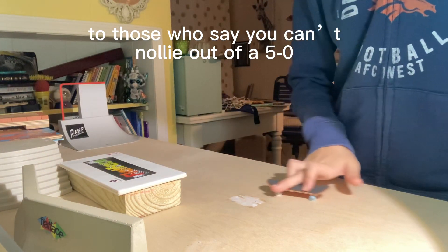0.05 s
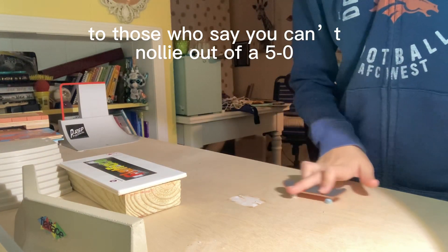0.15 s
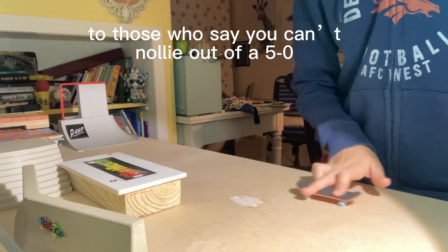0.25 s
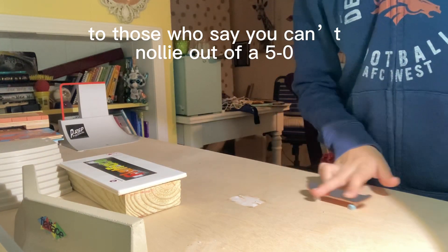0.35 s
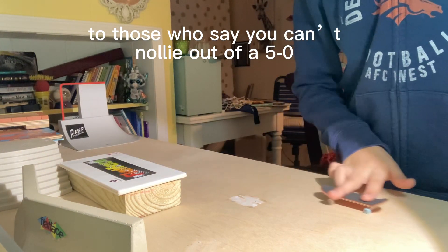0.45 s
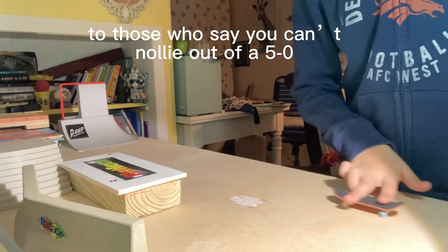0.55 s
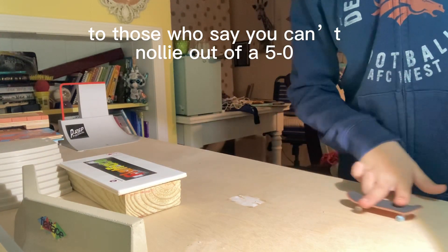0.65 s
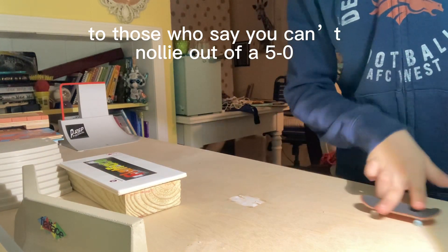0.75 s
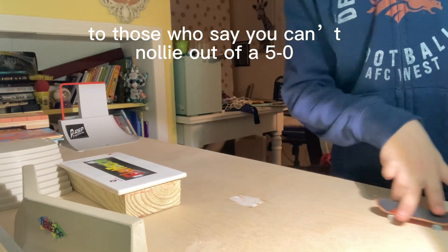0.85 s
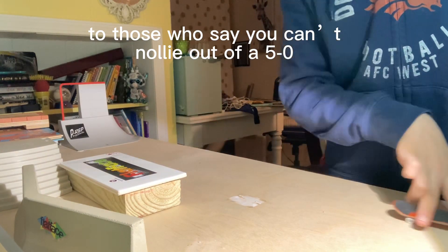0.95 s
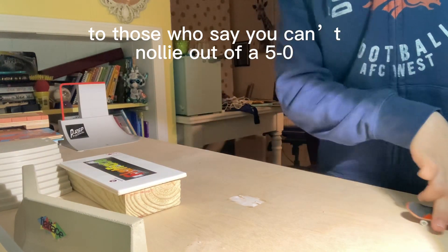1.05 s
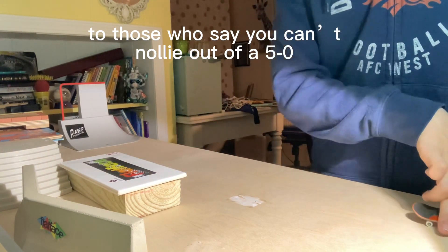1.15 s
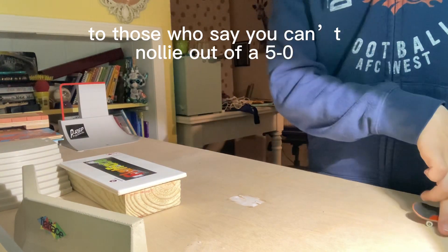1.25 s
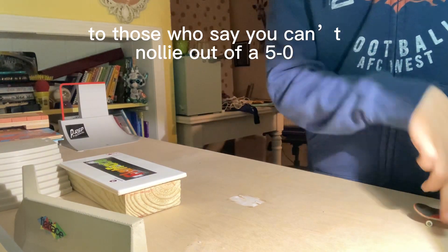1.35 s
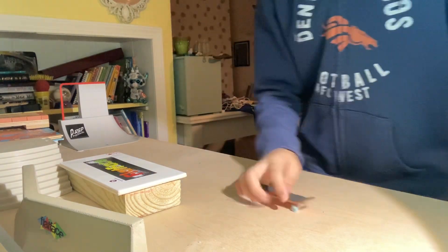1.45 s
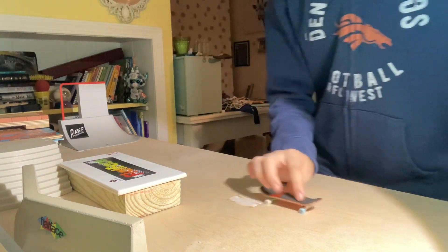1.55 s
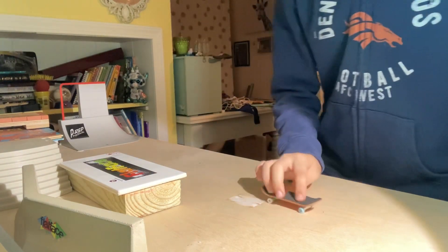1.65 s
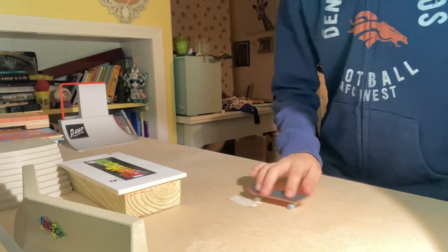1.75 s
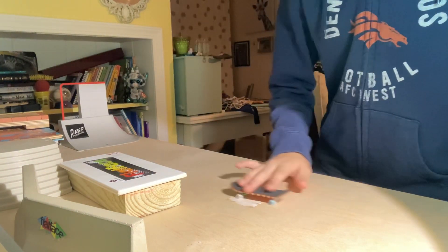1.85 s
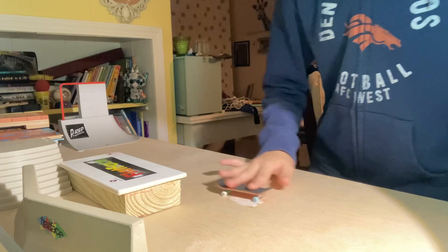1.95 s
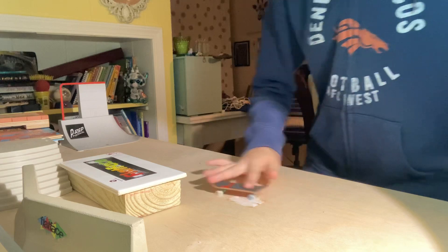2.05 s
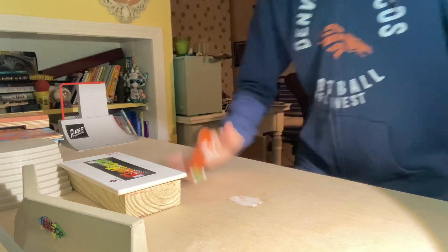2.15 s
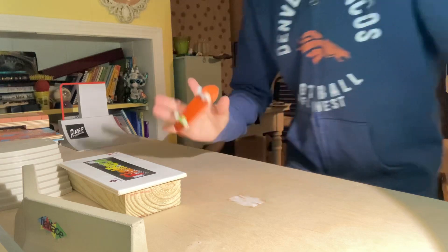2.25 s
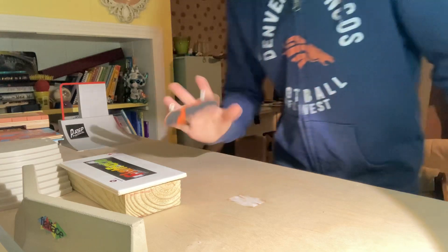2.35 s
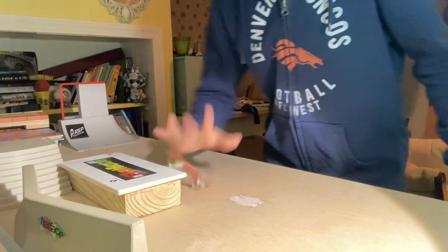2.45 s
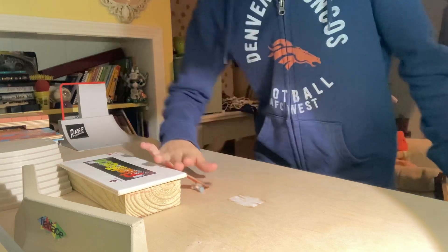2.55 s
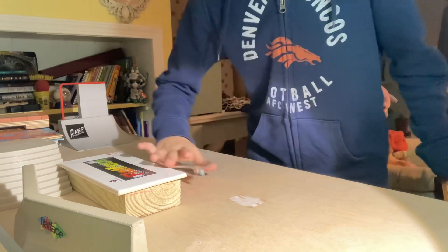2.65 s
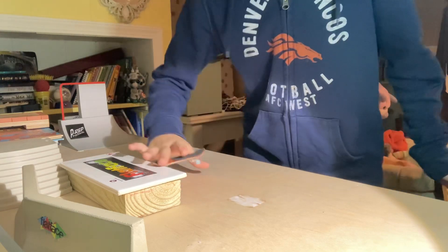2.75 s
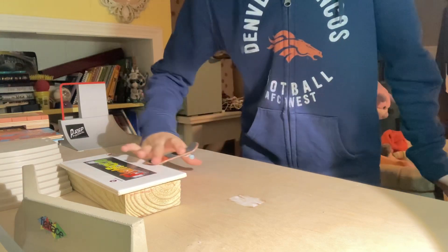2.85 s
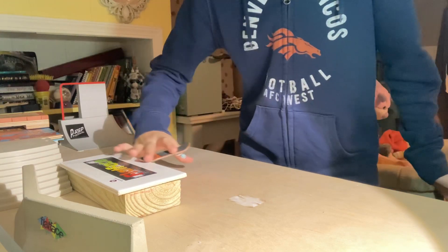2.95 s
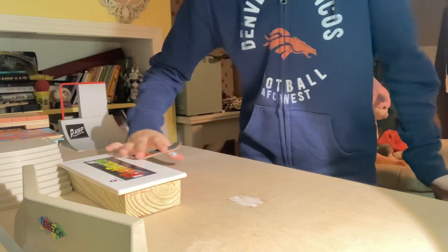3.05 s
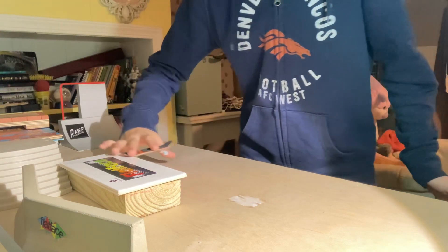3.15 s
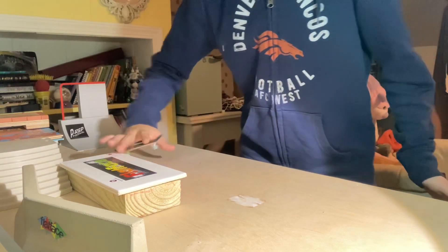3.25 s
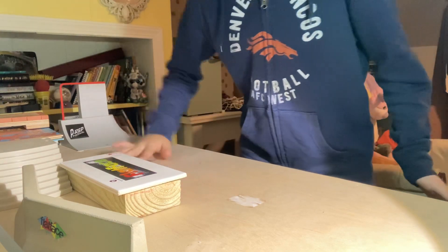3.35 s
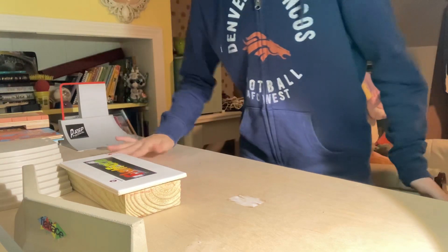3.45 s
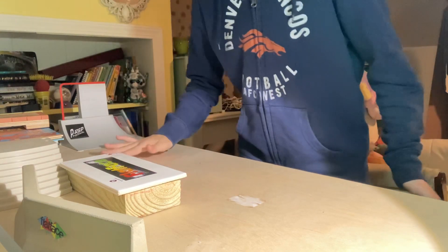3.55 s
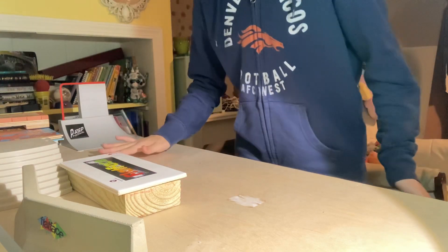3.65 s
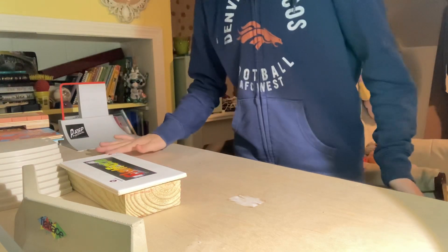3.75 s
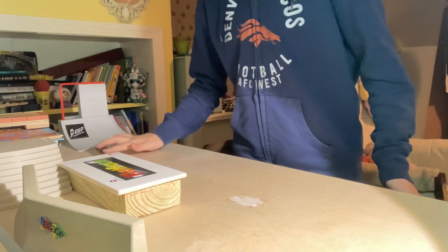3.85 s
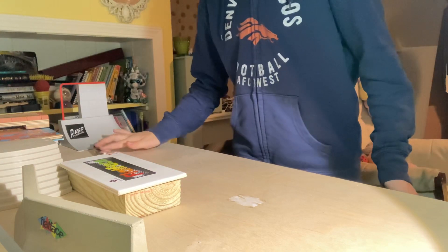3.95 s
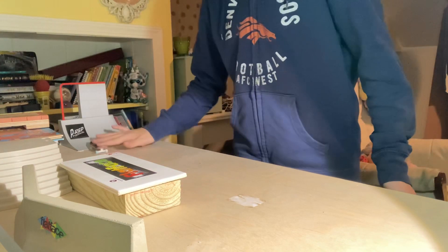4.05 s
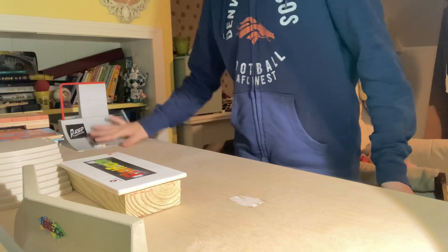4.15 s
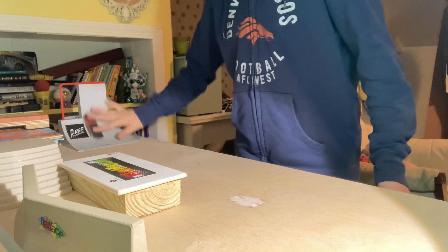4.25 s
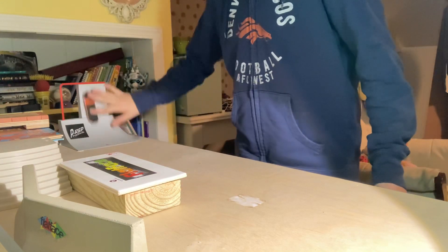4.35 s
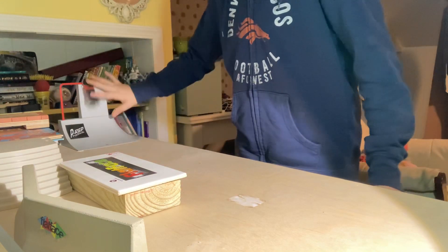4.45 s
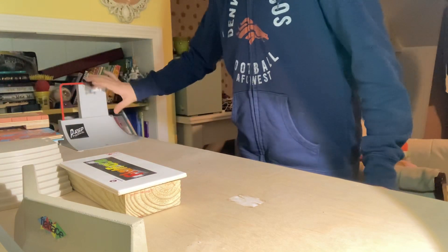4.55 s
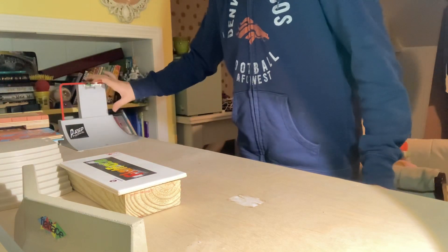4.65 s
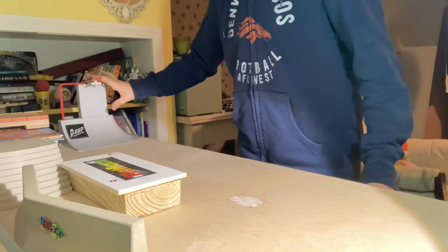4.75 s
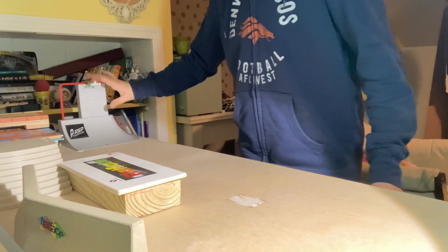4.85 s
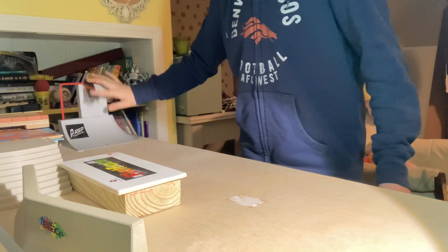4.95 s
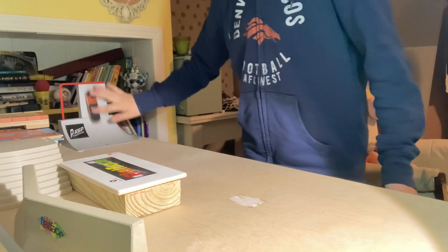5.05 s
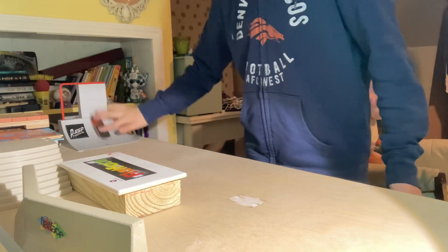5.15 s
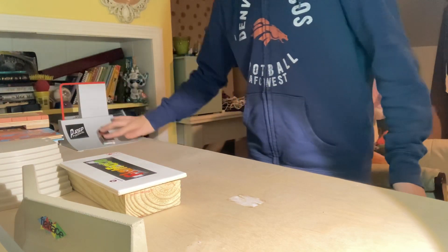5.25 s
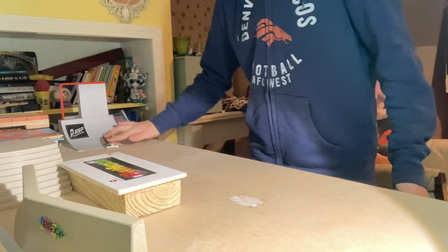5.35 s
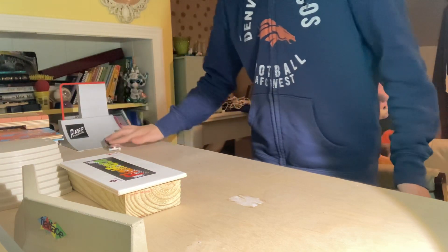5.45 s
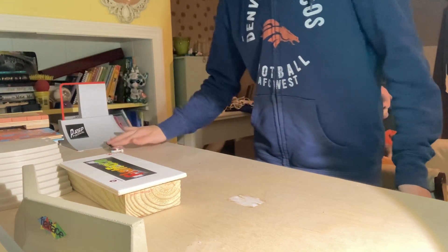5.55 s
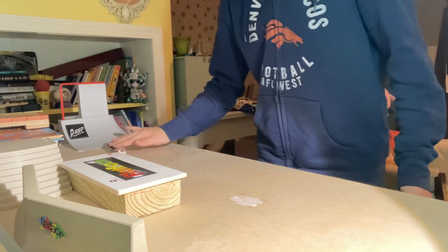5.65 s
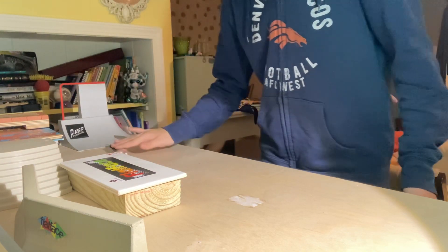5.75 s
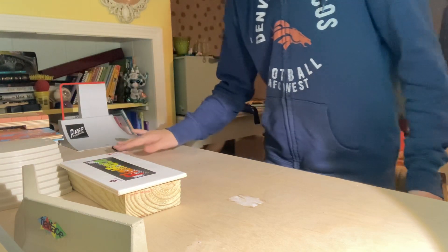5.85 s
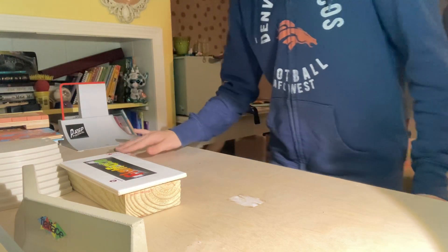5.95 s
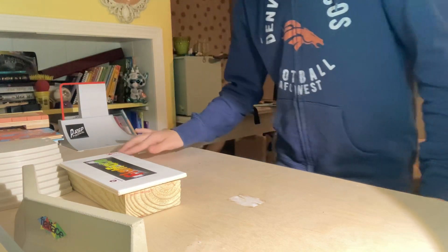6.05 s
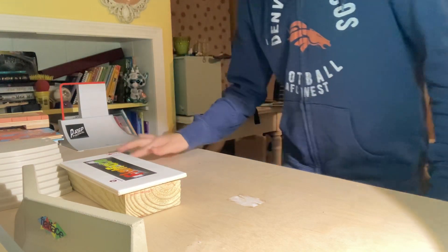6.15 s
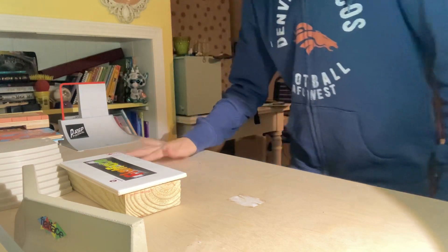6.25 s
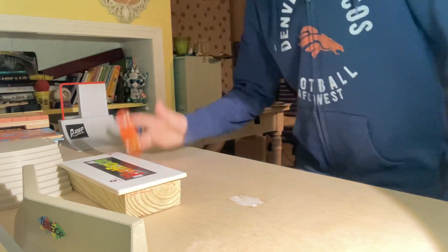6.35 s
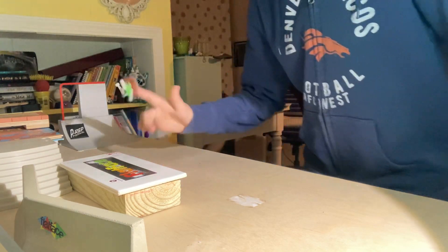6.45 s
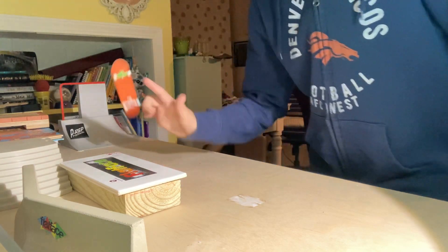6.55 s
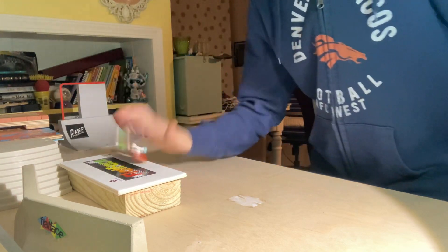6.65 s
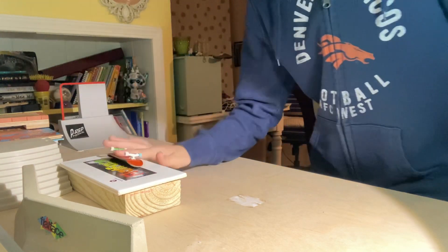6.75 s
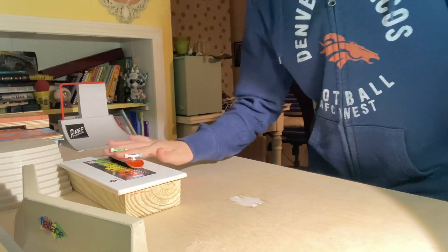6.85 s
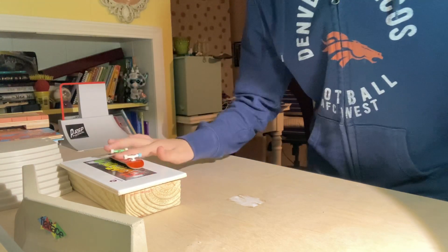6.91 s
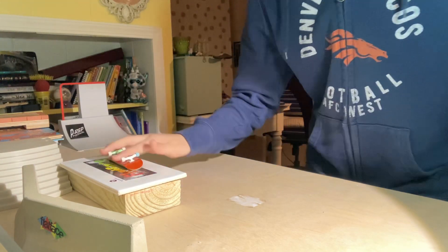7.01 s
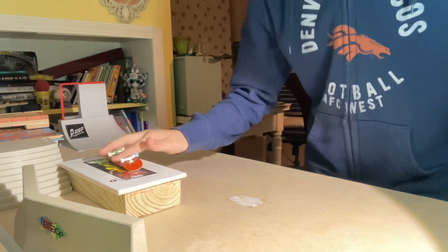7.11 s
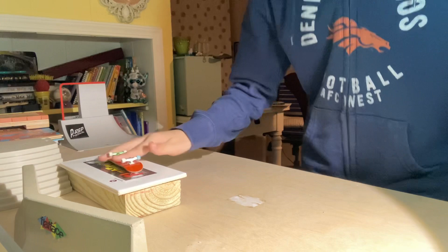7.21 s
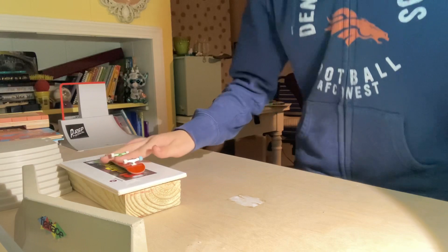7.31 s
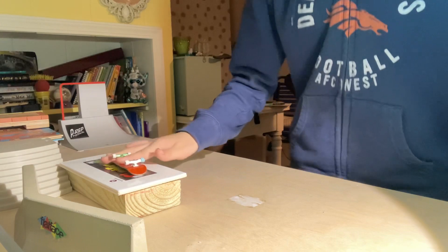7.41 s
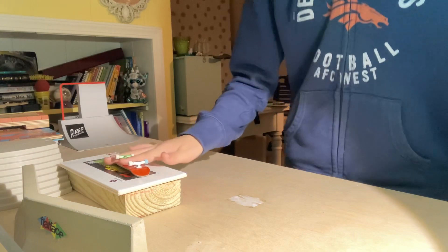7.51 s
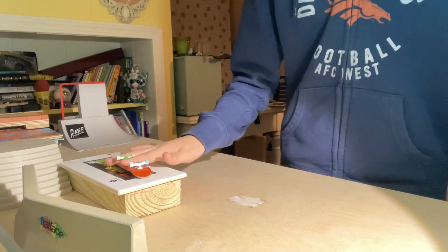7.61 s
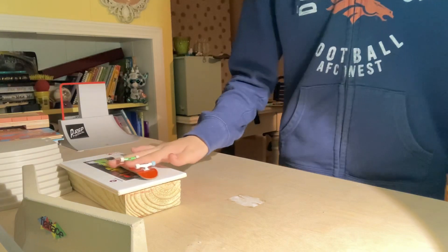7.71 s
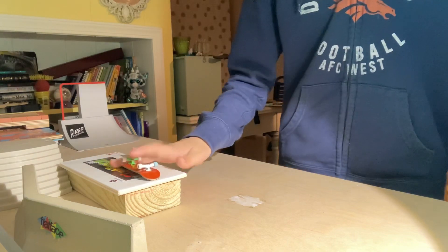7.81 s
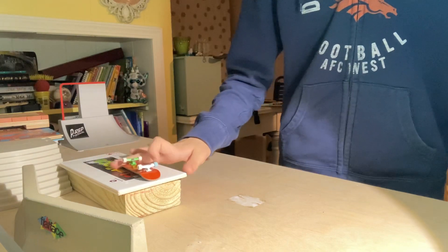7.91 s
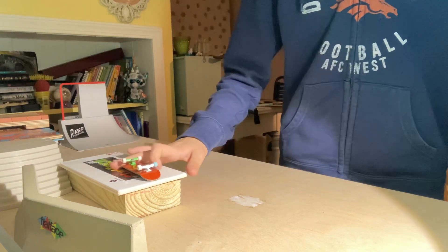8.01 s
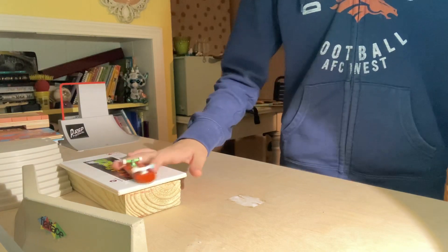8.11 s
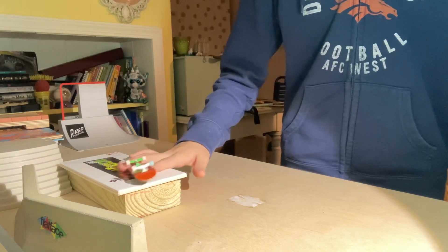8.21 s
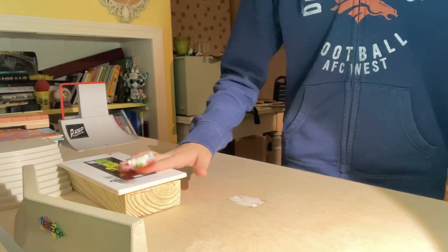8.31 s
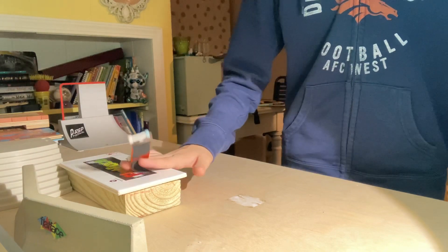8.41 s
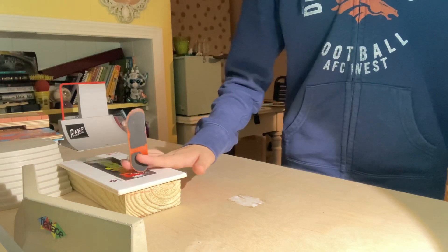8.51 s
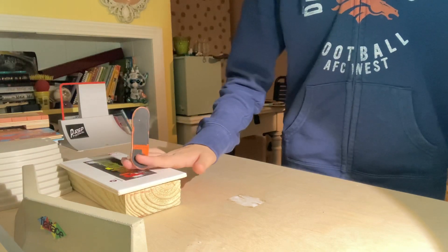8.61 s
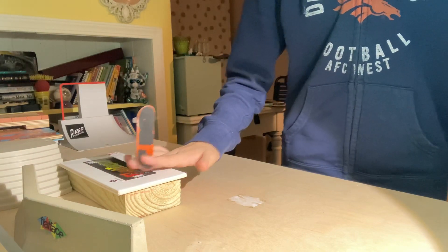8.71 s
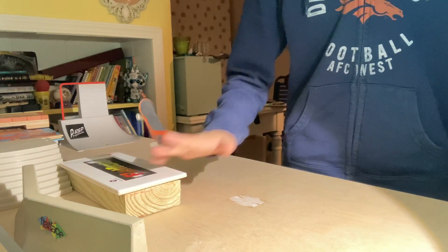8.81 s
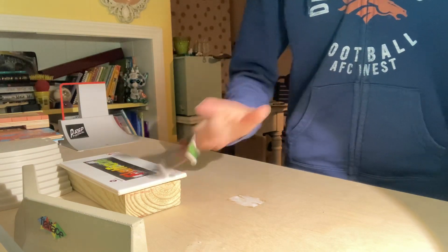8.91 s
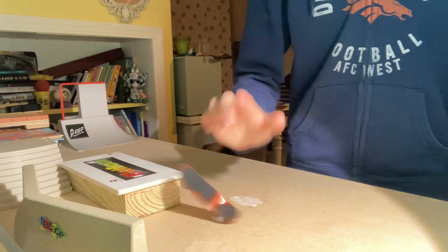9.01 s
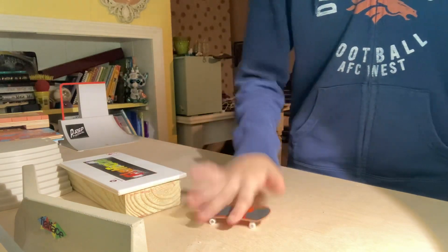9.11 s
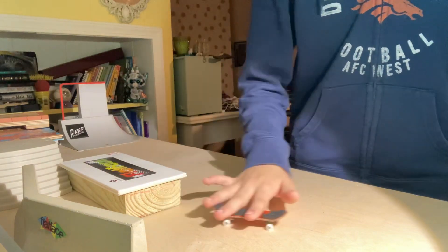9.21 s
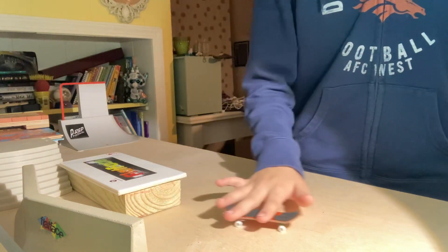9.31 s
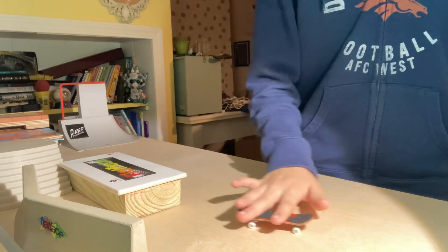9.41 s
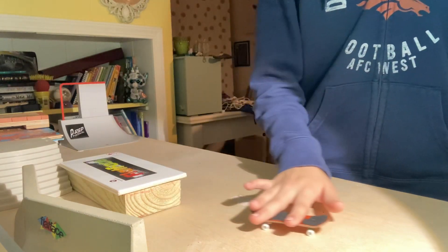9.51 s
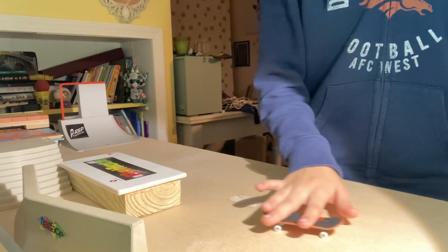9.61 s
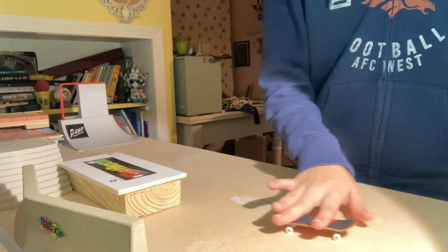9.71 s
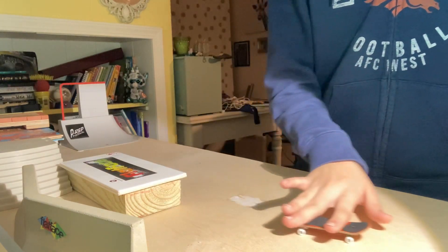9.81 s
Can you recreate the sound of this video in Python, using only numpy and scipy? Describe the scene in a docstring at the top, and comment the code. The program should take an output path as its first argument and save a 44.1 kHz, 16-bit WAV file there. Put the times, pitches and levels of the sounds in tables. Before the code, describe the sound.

Gritty little wheels roll over a desktop with sharp pops and landings, a hollow box knock, a near-silent pause, then a final rattling drop.

```python
"""A wooden desk in a small room: a toy skateboard rolls over it and up a small ramp, is popped,
lands, and grinds along a hollow box, where a hand then rubs and presses it.
Wheels and skin are gritty noise in moving colours; each contact cracks and rings the modes of desk or box.
Two microphone ports hear it with different colour and phase, with the room's answer, over a low house rumble."""
import sys
import numpy as np
from scipy import signal
from scipy.fft import rfft, irfft, next_fast_len
from scipy.io import wavfile
from scipy.ndimage import uniform_filter1d, map_coordinates

SR = 44100
rng = np.random.default_rng(int(sys.argv[2]) if len(sys.argv) > 2 else 0)


def bounce(signal):
    """Save signal as a 16-bit WAV file at the path given by the first command-line argument."""
    frames = np.transpose(np.atleast_2d(signal))
    limited = np.clip(frames, -1, 1)
    pcm = np.round(limited * 32767).astype(np.int16)
    wavfile.write(sys.argv[1], SR, pcm)


N = 435266  # samples

# rolling on desk and ramp, one curve a stroke:
# (time [s], low rumble [dB], roar of fast wheels [dB], loudest desk resonance [Hz])
ROLLING = [
    [(0, -45, -51, 764), (0.2, -38.5, -45.5, 701), (0.45, -46, -51, 780), (0.53, -48, -48, 815),
     (0.7, -42.5, -48, 830), (0.85, -43.5, -48, 840), (1.03, -48.5, -51.5, 835), (1.09, -60.5, -71, 744),
     (1.19, -81.5, -85, 430)  ],
    [(1.44, -66.5, -75, 610), (1.46, -45, -44.5, 430), (1.49, -36, -44.5, 432)],
    [(1.58, -57.5, -53, 600), (1.71, -53, -57, 627), (1.755, -35, -45.5, 606.5), (1.99, -38, -46, 623),
     (2.04, -64.5, -66.5, 590), (2.055, -42.5, -47, 620), (2.1, -55, -46, 820), (2.108, -35, -36.5, 950),
     (2.15, -35, -31, 980), (2.168, -51, -48, 800)],
    [(3.42, -43.5, -47, 470), (3.5, -33, -41, 700), (3.7, -48, -54, 700), (3.85, -43.5, -51.5, 490.7),
     (4.09, -34.5, -42, 480), (4.25, -32, -30.5, 510), (4.33, -35, -31.5, 506), (4.345, -34, -28, 977),
     (4.4, -38.5, -28.5, 975), (4.46, -47, -49, 960), (4.56, -68, -56, 887), (4.66, -48.5, -84, 435)],
    [(4.9, -75.5, -58, 542), (4.96, -47.5, -69, 500), (5.02, -76, -65, 880), (5.09, -41, -37.5, 880),
     (5.14, -42.5, -32.5, 467), (5.195, -35, -29.5, 477), (5.4, -35.5, -42.5, 469), (5.75, -45, -55, 450),
     (5.88, -44, -53, 504), (5.93, -42, -50, 743), (6.12, -39.5, -49, 644), (6.21, -32, -35.5, 658),
     (6.285, -36.5, -36, 837), (6.315, -53.5, -56, 600), (6.34, -45, -53, 640)],
    [(9.21, -55, -57.5, 719), (9.3, -53.5, -57, 850), (9.52, -48, -53, 594), (9.68, -56, -56.5, 609),
     (9.87, -49, -55.5, 604)],
]
# resonances of the desk top: (frequency [Hz], level before each contact's offsets [dB], free t60 [s])
DESK_MODES = [(105.3, -14, 0.14), (182, 3, 0.053), (271.7, 0.5, 0.042), (395, -4, 0.0087), (407, 4, 0.027),
              (598, 2, 0.025), (815, -17, 0.075), (1433, -12.5, 0.027), (1756, -8, 0.028),
              (2150, -11, 0.039), (2520, -15.5, .02), (2900, -13.5, 0.03), (3750, -17.5, 0.022)]
# bright fizz of a contact or tick: (frequency [Hz], relative level per Hz [dB])
FIZZ_SPECTRUM = [(3240, -16.5), (5500, -4.5), (6790, -8), (8450, 3), (10300, -11.5), (10900, -6.5),
                 (12300, 1), (14000, -17.5), (15500, -6.5), (16800, -31)]


def amp(db):
    """Gain of a level in dB."""
    return 10 ** (np.asarray(db) / 20)


def unit(x):
    """x at rms 1."""
    return x / np.sqrt(np.mean(x ** 2) + 1e-20)


def along(points, hz):
    """(Hz, value) points read on a log frequency axis."""
    f, v = np.transpose(points)
    return np.interp(np.log(hz + 1), np.log(f + 1), v)


def wobble(rate):
    """A smooth random curve, rate knots a second, held for 16 samples at a time."""
    knots = rng.standard_normal(int(N * rate / SR) + 4)
    curve = map_coordinates(knots, [np.arange(0, N, 16) * rate / SR])
    return np.repeat(curve, 16)[:N]


def filtered(x, response):
    """x times a complex response of frequency."""
    n = x.shape[-1]
    m = next_fast_len(n + 4096)
    return irfft(rfft(x, m) * response(np.fft.rfftfreq(m, 1 / SR)), m)[..., :n]


def shape(points, hz):
    """Gain of a spectrum, scaled so that white noise keeps its power."""
    power = np.mean(amp(along(points, np.linspace(0, SR / 2, num=2000))) ** 2)
    return amp(along(points, hz)) / np.sqrt(power)


def resonance(hz, centre_hz, half_width):
    """A peak of height 1 on a log frequency axis; half_width in octaves."""
    return 1 / (1 + (np.log2((hz[:, None] + 1) / centre_hz) / half_width) ** 2)


def stroke(rows, t):
    """The frames inside a stroke and its columns read there."""
    s, *columns = np.transpose(rows)
    now = (t >= s[0]) & (t <= s[-1] + .012)
    return now, [np.interp(t[now], s, column) for column in columns]


def friction(grit_db, bump_db, patchy_db, lumps_db):
    """Wheels, axles and skin on wood grain: gritty noise in the colour of each stroke; two unlike views of it."""
    # the board grinds along the box: (time [s], scrape level [dB])
    grind = [(2.56, -51), (2.72, -59), (2.94, -60), (3.02, -51), (3.08, -55), (3.17, -48), (3.26, -51),
             (3.35, -71)]
    # friction on the box lid: (frequency [Hz], relative level per Hz [dB])
    scrape_spectrum = [(260, -45.5), (450, 0.5), (500, 4), (563, -18), (1010, 0), (1700, -8), (2160, -6.5),
                       (3230, -13.5), (6630, -23), (8930, -14.5), (10100, -31), (12200, -22), (16000, -36)]
    # fingers on the board: (frequency [Hz], relative level per Hz [dB])
    skin_spectrum = [(260, -28.5), (500, 5.5), (1200, -1), (2500, -3.5), (4800, -1), (6500, -24.5),
                     (9000, -3), (16000, -33)]
    grit = amp(grit_db * wobble(160) + bump_db * wobble(35))
    noise = unit(grit * rng.standard_normal((2, N)))
    hz, t, z = signal.stft(noise, SR, nperseg=1024, noverlap=768)
    gain = grind_colour(hz, skin_spectrum, handling(t), boom_db=13)
    now, (scrape_db,) = stroke(grind, t)
    gain[:, now] = grind_colour(hz, scrape_spectrum, amp(scrape_db), boom_db=4)
    for rows in ROLLING:
        now, columns = stroke(rows, t)
        gain[:, now] = wheel_colour(hz, t[now], *columns)
    # slow random unevenness, separate in each narrow band
    patches = uniform_filter1d(rng.standard_normal(gain.shape), size=24, axis=1)
    # brief swells, each in its own wider band
    lumps = uniform_filter1d(rng.standard_normal(gain.shape), size=5, axis=1)
    lumps = uniform_filter1d(lumps, size=12, axis=0)
    uneven = amp(patchy_db * unit(patches) + lumps_db * unit(lumps))
    # loudness leaves the frames here and returns sample by sample
    coloured = signal.istft(z * gain / loudness(t) * uneven, SR, nperseg=1024, noverlap=768)[1]
    return coloured[:, :N] * loudness(np.arange(N) / SR)


def wheel_colour(hz, t, rumble_db, roar_db, peak_hz):
    """Gain over frequency and time: one desk resonance glides through each stroke; stronger hiss is brighter."""
    # spectra of low rumble, deep boom, wheel hiss, and desk top under fast wheels:
    # (frequency [Hz], relative level per Hz [dB])
    rumble_spectrum = [(190, -43.5), (320, -3.5), (489, -1), (726, -5), (950, -15.5), (1240, -41),
                       (2090, -120)]
    boom_spectrum = [(41, -34.5), (70, -6), (177, 0), (216, 8.5), (350, -17.5), (460, -29.5), (770, -120)]
    hiss_spectrum = [(1290, -30.5), (2200, 4), (3030, 2.5), (4900, -5.5), (6210, -17), (8770, -7.5),
                     (10100, -39), (11100, -15.5), (12600, -18.5), (13900, -33.5), (15800, -18),
                     (16500, -37)]
    roar_spectrum = [(530, -24.5), (900, 1.5), (1200, -3.5), (1500, -5), (1800, -6.5), (2700, -16.5),
                     (3510, -34.5), (5940, -120)]
    # a higher desk resonance that shifts in pitch: (time [s], frequency [Hz], level over the roar [dB])
    upper_steps = [(0, 1120, 8), (.5, 1100, -2), (.53, 1310, 13), (.84, 1260, 20), (.88, 1610, -5),
                   (1.1, 1604, 0), (3.449, 1343, 13), (4.049, 1410, 7), (4.119, 1960, 16.5),
                   (4.34, 1342, 2.5), (6.3, 1303, 15), (9.25, 975, 7.5), (9.47, 880, 10), (9.5, 1143, 14.5)]

    # boom and hiss grow with rumble and roar, in dB per dB
    boom_db = -52.5 + 0.66 * (rumble_db + 40)
    hiss_db = -48.5 + 1.066 * (roar_db + 40.5)

    rumble = shape(rumble_spectrum, hz)[:, None] * amp(12 * resonance(hz, peak_hz, 0.06))
    rumble = amp(rumble_db) * rumble / np.sqrt(np.mean(rumble ** 2, axis=0))
    boom = np.outer(shape(boom_spectrum, hz), amp(boom_db))

    octaves_up = np.clip(np.log2((hz[:, None] + 1) / 4000), 0, 2)
    hiss = np.outer(shape(hiss_spectrum, hz), amp(hiss_db)) * amp(0.18 * (hiss_db + 40.5) * octaves_up)

    s, upper_hz, upper_db = np.transpose(upper_steps)
    upper = amp(np.interp(t, s, upper_db) * resonance(hz, np.interp(t, s, upper_hz), 0.045))
    roar = np.outer(shape(roar_spectrum, hz), amp(roar_db)) * upper
    # the upper desk modes stand out of roar and hiss
    plate = amp(sum(2 * resonance(hz, mode, 0.011) for mode, _, _ in DESK_MODES if mode > 1100))
    return np.sqrt(rumble ** 2 + plate ** 2 * (hiss ** 2 + roar ** 2) + boom ** 2)


def loudness(t):
    """Overall gain of the wheels at any moment; its edges are sharper than the colour changes."""
    s, rumble_db, roar_db, _ = np.transpose(sum(ROLLING, []))
    return np.hypot(amp(np.interp(t, s, rumble_db)), 2 * amp(np.interp(t, s, roar_db)))


def grind_colour(hz, spectrum, scrape, boom_db):
    """Gain over frequency and time: a scrape with the boom of the hollow box, boom_db re the scrape."""
    # the hollow box: (frequency [Hz], relative level per Hz [dB])
    hollow_spectrum = [(29, -42), (50, -14.5), (113, -1), (210, -8), (276, -8.5), (450, -21), (580, -51),
                       (990, -120)]
    return np.outer(np.hypot(shape(spectrum, hz), amp(boom_db) * shape(hollow_spectrum, hz)), scrape)


def handling(t):
    """Fingers rub and press the board on the box: bell-shaped swells over the scrape of the resting hand."""
    # rubs: (time of the middle [s], length [s], scrape level [dB])
    rub_events = [(6.935, 0.079, -83), (7.746, 0.134, -81.5), (7.551, 0.073, -68), (8.319, 0.03, -71.5),
                  (8.492, 0.038, -83.5), (8.627, 0.032, -82.5)]
    # hand at rest on the board: (start [s], end [s])
    start, end = (6.84, 8.94)
    rest_db = -86
    rubs = sum(amp(db) * np.exp(-(2 * (t - s) / length) ** 2) for s, length, db in rub_events)
    return (amp(rest_db) + rubs) * (t > start) * (t < end)


def desk_contacts():
    """Wheels and board strike desk and ramp; the upper ring grows with the strength of the contact."""
    # (time [s], level [dB], then re that level before the offsets below: thud [dB], knock [dB], fizz [dB];
    # short ping [Hz], inaudible near 0)
    strikes = [(0.5297, -35, -13, -2, -24, 2), (0.8119, -28, -9, -6, -33, 1305),
               (1.2939, -20.5, -14, -6.5, -16, 3039.5), (1.4963, -2, -16.5, -14, -20, 1934),
               (1.6148, -23, -9.5, -3.5, -23.5, 2978.5), (2.1018, -24, -16, -22.5, -20.5, 2592.5),
               (2.1761, -10, -14, -5.5, -10, 1784), (3.3783, -5.5, -24, -21.5, -25.5, 2153.5),
               (3.3839, -8.5, -18.5, -6.5, -22.5, 1320), (4.1031, -23.5, -7, -8, -19.5, 0),
               (4.1962, -12, -16.5, -13.5, -20, 1000), (4.35, -19, -29.5, -32, -10, 1450),
               (4.4325, -21, -11, -19, -13.5, 4700), (4.5157, -27, -5.5, -8, -7, 4851),
               (4.9403, -35.5, -5.5, -12.5, -16.5, 3479.5), (5.0392, -34.5, -14, -16.5, -25.5, 1841),
               (5.0718, -21.5, -18, -22.5, -17.5, 4608.5), (5.1153, -22, -22.5, -24.5, -17.5, 1510.5),
               (5.183, -13.5, -19, -28, -18, 1720), (5.4755, -20.5, -24, -25.5, -24, 2348),
               (5.4931, -23.5, -22.5, -8, -17.5, 2196), (6.3445, -8.5, -1.5, -3, -10, 1842.5),
               (9.058, -25.5, -18, -14, -24, 1772), (9.0688, -7.5, -11.5, -10.5, -12.5, 3920),
               (9.075, -13, -16, -2.5, -24, 1810), (9.087, -28, -17.5, -13, -26, 2013),
               (9.0986, -15.5, -17.5, -25.5, -13, 4), (9.108, -25, -17, -21.5, -17, 1803),
               (9.151, -4.5, -23, -14, -13.5, 6.5), (9.1637, -7, -20.5, -18, -16.5, 3126),
               (9.1692, -9.5, -18, -18, -15, 1618), (9.1781, -12, -6, -5.5, -22, 2.5),
               (9.6773, -41, 1.5, 4, -21, -4.5)]
    # every contact has the same share of bare click, .2
    events = [(*row[:5], 0.3 + 0.39 * row[1], .2, row[5]) for row in strikes]
    return contacts(events, DESK_MODES, free=0.88, thump_db=9.5, crack_db=-5.5, fizz_db=11.0,
                    crack_t60=0.033, rough=0.63)


def box_contacts():
    """The board strikes the hollow box, whose modes ring a little shorter than when free."""
    # (time [s], level [dB], then re that level before the offsets below: thud [dB], knock [dB], fizz [dB],
    # ring of the upper modes [dB]; share of the fizz that is one bare click [0-1])
    strikes = [(2.4841, -19, -5.5, -6.5, 4.5, -2.5, .1), (2.5068, -6, -13.5, 2, -7.5, -13, .3),
               (2.5296, -22.5, -12, -9.5, -2, -6, .2), (2.5419, -14, -17, -13.5, 3, -16, .2),
               (2.5972, -15.5, -18.5, -15.5, -14.5, -22, .1), (2.7873, -39, 1, -9.5, -5.5, -7, .3),
               (2.922, -37.5, -5, -31, -13, -12.5, .3), (2.9692, -35, 6, -16, -3, -5, .3),
               (2.9918, -35.5, 3, -9.5, -0.5, -9.5, .3), (6.691, -12.5, -6, -12, 3.5, -10.5, .55),
               (6.7088, -21, -5, -14.5, 2, -9, .9), (6.717, -26, -7.5, -17, -6, -9, .2),
               (6.7357, -17.5, -4.5, -12, 2, -13.5, .8), (8.0169, -44.5, 13.5, 9.5, -28.5, 4.5, .3),
               (8.1039, -53.5, 20, 14.5, -15, 14, .3), (8.977, -22.5, -13, -12.5, 9.5, -4, .1),
               (8.982, -15.5, -15, -8.5, 4.5, 0.5, .2), (8.9931, -14.5, -5.5, -16.5, -3, -5, .2)]
    # resonances of the box: (frequency [Hz], level before each contact's offsets [dB], free t60 [s])
    box_modes = [(81, -6.5, 0.25), (120, 3, 0.1), (172, 2.5, 0.073), (262, 7, 0.036), (368, 4, 0.035),
                 (476, -4.5, 0.071), (986, -9.5, 0.12), (1880, -10, 0.034), (2130, -6, 0.099),
                 (2520, -9.5, 0.048), (3020, -8.5, 0.049), (3600, -10.5, 0.098), (4140, -9, 0.038),
                 (4650, -13, .045)]
    events = [(*row, 0) for row in strikes]  # no ping
    return contacts(events, box_modes, free=0.9, thump_db=3, crack_db=-9.0, fizz_db=5.0,
                    crack_t60=0.034, rough=0.45)


def contacts(events, modes, free, thump_db, crack_db, fizz_db, crack_t60, rough):
    """Each contact is a burst of noise and rings the modes, low ones swelling more slowly.

    free is the share of the free ring time; rough is the phase drift in radians per 64-sample step."""
    # body of the crack: (frequency [Hz], relative level per Hz [dB])
    crack_spectrum = [(410, -24), (700, 1.5), (1170, -4.5), (2080, -0.5), (2490, -4), (3970, -3),
                      (6500, -22.5), (8450, -44.5), (14300, -120)]
    soft_dulls = 0.8  # dB lost by the modes above 1.1 kHz per dB of thud above 0
    ping_db, ping_t60 = -1.5, .013  # dB re contact, s
    click_db = 14  # height of a bare click over the fizz

    out, t = np.zeros((2, N + SR)), np.arange(SR // 5) / SR
    hz, mode_db, t60 = np.transpose(modes)
    decay_db = -60 * t / t60[:, None]
    swell = (1 - np.exp(-t * hz[:, None] / 1.18)) ** 2
    bursts = (len(events), 2, len(t))
    crackle = filtered(rng.standard_normal(bursts), lambda f: shape(crack_spectrum, f))
    fizz = filtered(rng.standard_normal(bursts), lambda f: shape(FIZZ_SPECTRUM, f))
    impulse = 1. * (np.arange(len(t)) == SR // 500)
    click = filtered(impulse, lambda f: shape(FIZZ_SPECTRUM, f))
    scatter_db = rng.normal(0, 2.5, (len(events), 2, len(modes)))
    # the modes above 900 Hz drift randomly in phase, which roughens their ring
    steps = rng.standard_normal((len(events), len(modes), len(t) // 64 + 1))
    drift = rough * np.cumsum(steps, axis=2)
    fade = (1 - np.exp(-(t / 0.0017) ** 2)) * amp(-60 * t / crack_t60)

    for k, (s, db, thud_db, knock_db, high_db, ring_db, bare, ping_hz) in enumerate(events):
        bands = [hz < 230, hz < 900, hz < 1100]
        levels = [thud_db + thump_db, knock_db + thump_db, ring_db]
        offset_db = np.select(bands, levels, ring_db - soft_dulls * max(thud_db, 0))
        strength = amp(mode_db + offset_db + scatter_db[k])
        wander = (hz[:, None] > 900) * np.repeat(drift[k], 64, axis=1)[:, :len(t)]
        ring = swell * amp(decay_db / free) * np.sin(2 * np.pi * hz[:, None] * t + wander)

        bare = np.clip(bare, 0, 1)
        sharp = (1 - bare) * fade ** 2.1 * fizz[k] + bare * amp(click_db) * click
        ping = amp(ping_db - 60 * t / ping_t60) * (1 - np.exp(-t / 0.00056)) * np.sin(2 * np.pi * ping_hz * t)
        noise = fade * amp(crack_db) * crackle[k] + amp(high_db + fizz_db) * sharp + ping
        # the burst starts 1 ms ahead of the listed time
        out[:, round((s - .001) * SR):][:, :len(t)] += amp(db) * (strength @ ring + noise)
    return out[:, :N]


def ticks():
    """Thin ticks, probably of axles and wheels over specks: very short bursts of fizz."""
    # (time [s], level before the common 5 dB cut [dB])
    tick_events = [(1.8701, -46.5), (1.9126, -47), (1.951, -42), (3.1357, -43), (3.2492, -44), (5.156, -28),
                   (7.5431, -53), (9.4421, -47), (9.5267, -44)]
    t60 = 0.024  # s
    out, t = np.zeros((2, N + SR)), np.arange(SR // 40) / SR
    bursts = filtered(rng.standard_normal((len(tick_events), 2, len(t))), lambda f: shape(FIZZ_SPECTRUM, f))
    bursts = bursts * amp(-60 * t / t60)
    for (s, db), burst in zip(tick_events, bursts):
        out[:, round(s * SR):][:, :len(t)] += amp(db - 5.0) * burst
    return out[:, :N]


def ports(pair):
    """The right port is shaded, its phase against the left changes with frequency, and part of it is its own."""
    # left over right: (frequency [Hz], level [dB])
    louder_left = [(60, 10), (110, 5), (200, 5.5), (380, 6.5), (700, 11), (1290, 9.5), (2380, 7), (4400, 5),
                   (8120, -0.5), (15000, 0)]
    # phase of the left port against the right: (frequency [Hz], phase [rad])
    phase_between = [(60, .4), (170, .7), (520, .9), (690, 2.9), (860, 5), (1380, 5.8), (1720, 7),
                     (2900, 8.9), (3900, 7.5), (5170, 4.1), (6900, 1.8), (8600, -.4), (11200, 1.5)]
    # sound common to both ports: (frequency [Hz], share [0-1], held below .96)
    alike = [(100, 0.62), (450, 1), (690, .4), (1000, 1), (2000, .45), (2900, .65), (4300, 0.51),
             (7000, 0.88), (8600, 0.87), (11000, 1)]

    def weights(hz):
        share = np.clip(along(alike, hz), 0, .96)
        shade, phase = amp(-along(louder_left, hz)), along(phase_between, hz)
        # keeps the level of the two ports' sum
        norm = 2 / np.sqrt(1 + shade ** 2 + 2 * shade * share * np.cos(phase))
        right = norm * shade * np.exp(-1j * phase)
        return np.array([[norm, 0 * norm], [right * share, right * np.sqrt(1 - share ** 2)]])
    return filtered(pair, weights).sum(axis=1)


def room(x, stretch=16384):
    """The room answers with a decaying noise tail, drawn anew for each stretch of samples."""
    # decay of the room: (frequency [Hz], t60 [s])
    room_decay = [(100, 0.14), (500, 0.22), (2000, 0.18), (6000, 0.18), (14000, 0.13)]
    out = np.zeros((2, N + SR))
    for start in range(0, N, stretch):
        hz, t, z = signal.stft(rng.standard_normal((2, SR // 3)), SR, nperseg=256)
        decay = amp(-60 * t / along(room_decay, hz)[:, None])
        tail = signal.istft(z * decay, SR, nperseg=256)[1]
        tail = tail / np.linalg.norm(tail[0])
        wet = signal.fftconvolve(x[None, start:start + stretch], tail, axes=1)
        out[:, start + 130:][:, :wet.shape[1]] += wet  # 3 ms late
    return out[:, :N]


def house():
    """The low rumble of the house is noise that wavers; its bass reaches both ports alike."""
    # (frequency [Hz], relative level per Hz [dB])
    house_spectrum = [(20, -6.5), (55, 7.5), (90, 2), (125, 8), (151, -10), (737, -29.5), (1290, -33),
                      (1720, -33), (7170, -40.5), (10100, -48), (13200, -37), (16000, -49.5)]

    def mix(hz):
        shared = 1 / np.sqrt(1 + (hz / 450) ** 2)
        paths = np.array([[1 + 0 * hz, 0 * hz], [shared, np.sqrt(1 - shared ** 2)]])
        return shape(house_spectrum, hz) * paths
    rumble = filtered(rng.standard_normal((2, N)), mix).sum(axis=1)
    return amp(-59.0 + 1.3 * wobble(4.2)) * rumble * amp([[1.5], [-1.5]])


def scene():
    """Board, room and house at the two ports."""
    hits = desk_contacts() + box_contacts()
    rubs = friction(grit_db=1.5, bump_db=1.7, patchy_db=3.0, lumps_db=2) + ticks()
    answer = amp(-8.5) * amp([[2.5], [-2.5]]) * room(hits[0] + amp(-2) * rubs[0])
    return ports(hits + rubs) + answer + house()


def record(dry):
    """Peaks are softly clipped and nothing is kept above the band limit."""
    top_hz = 16830
    soft = dry / (1 + np.abs(dry / .92) ** 6) ** (1 / 6)
    return filtered(soft, lambda hz: hz < top_hz)


dry = scene()
out = record(dry)
bounce(out)
```